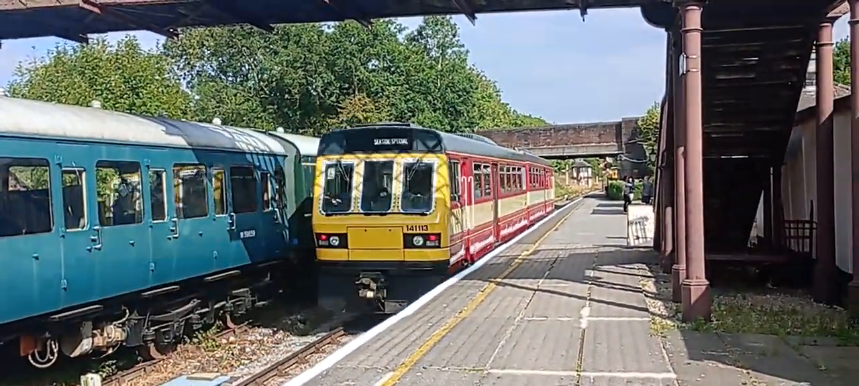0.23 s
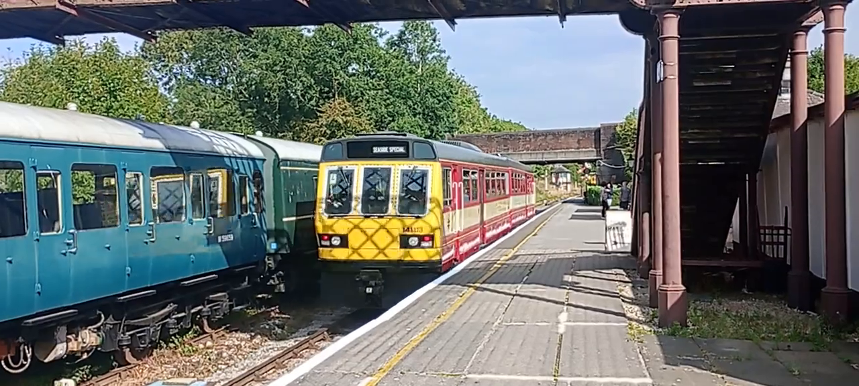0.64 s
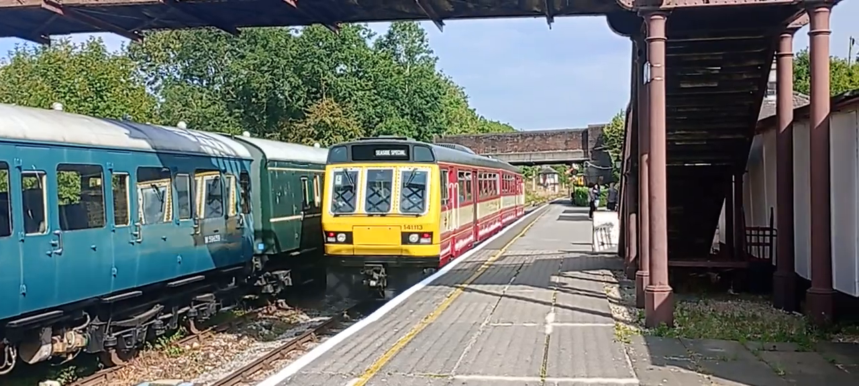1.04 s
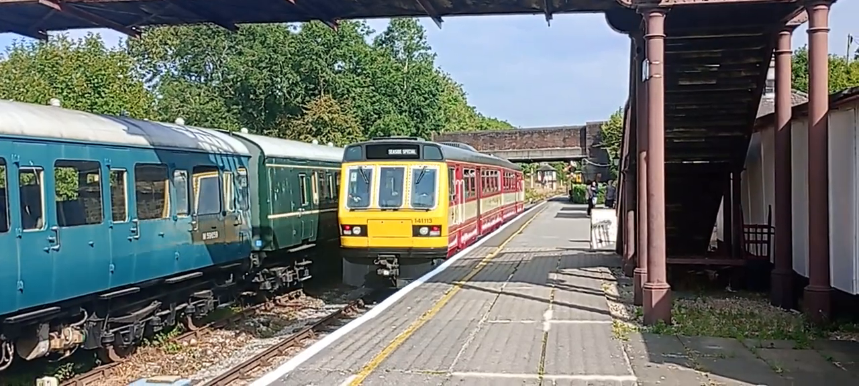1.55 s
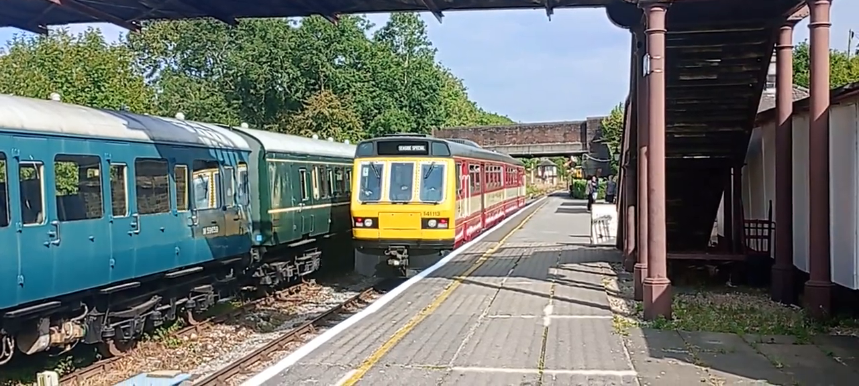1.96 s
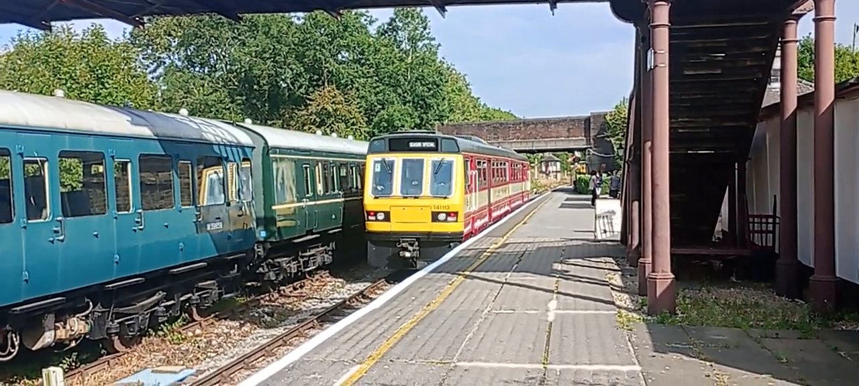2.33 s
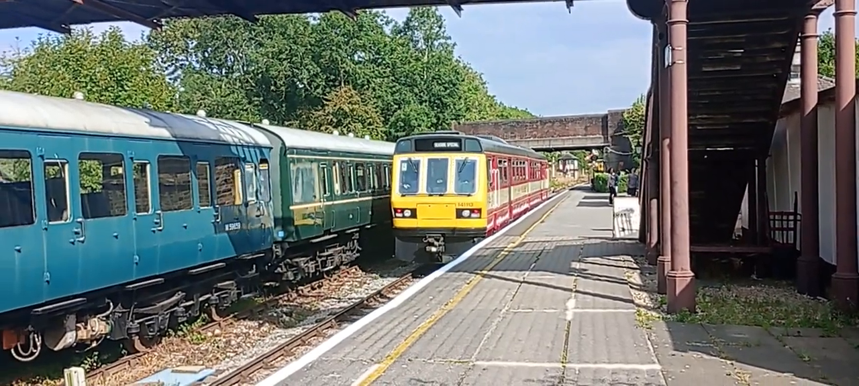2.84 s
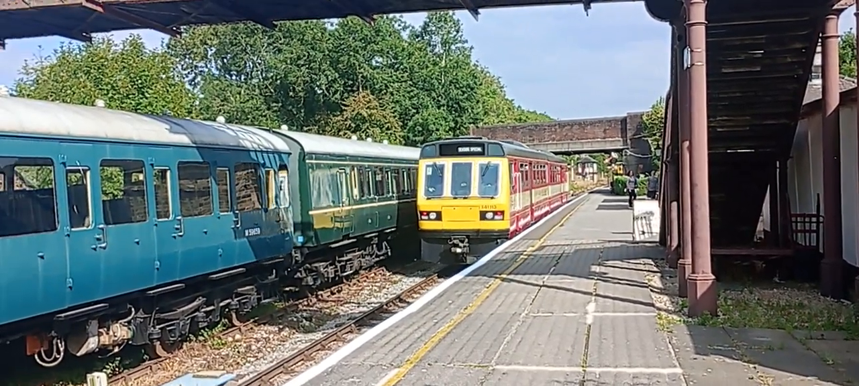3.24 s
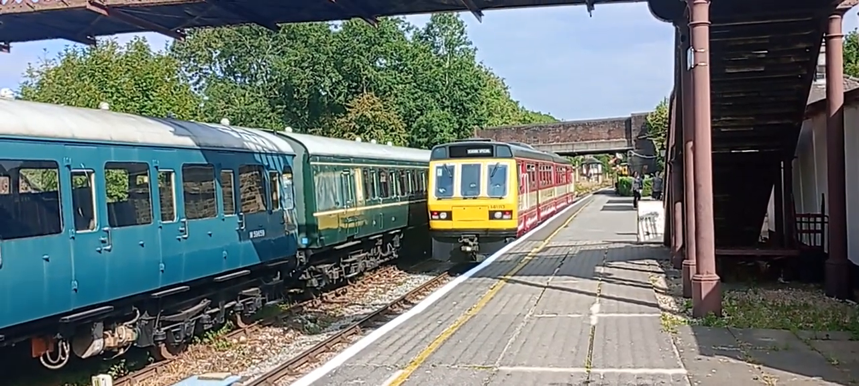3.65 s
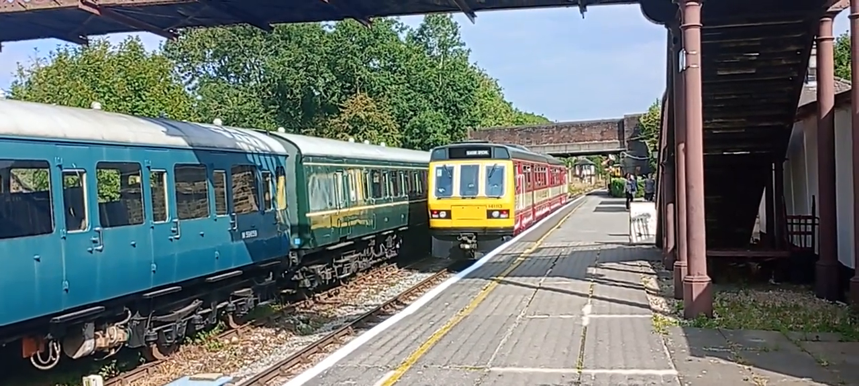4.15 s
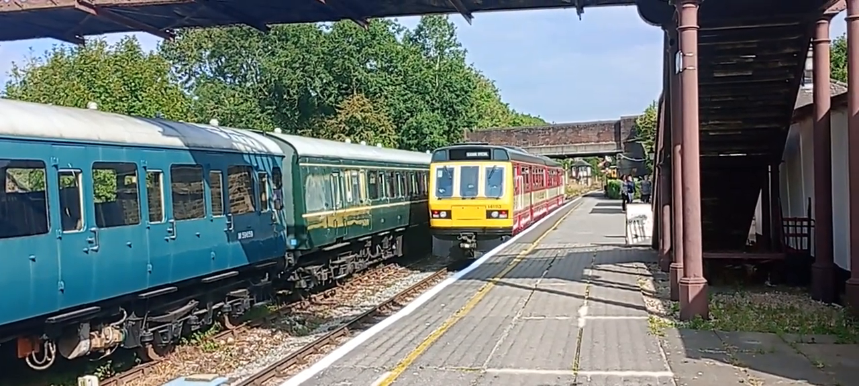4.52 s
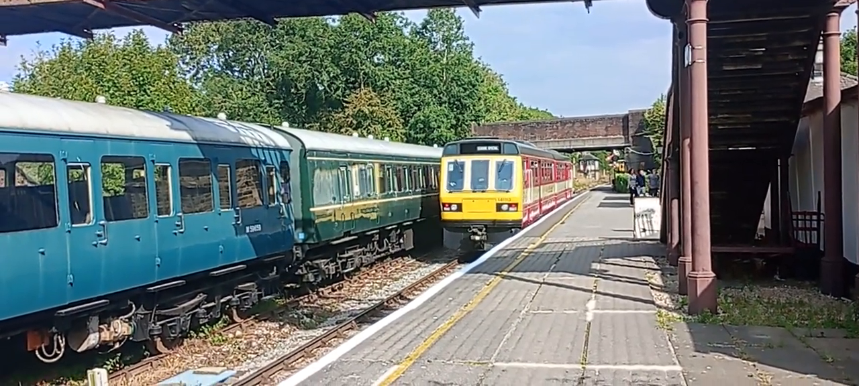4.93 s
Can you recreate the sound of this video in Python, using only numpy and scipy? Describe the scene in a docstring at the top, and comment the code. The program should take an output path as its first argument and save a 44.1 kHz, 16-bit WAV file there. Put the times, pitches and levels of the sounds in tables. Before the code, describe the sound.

A quiet outdoor platform bed: soft airy hiss and a far diesel murmur with a faint low hum near 85 hertz. By about 0.5 s a piercing wheel-flange squeal around 5.7 kHz emerges, jumping up at 0.7 s, beating and fluttering with short station echoes. Harsh, buzzy metallic rasps shake it from 0.7 to 1.5 s, with a brief hollow rumble near 0.9 s. It fades by 1.65 s, leaving mostly engine and air. From 2.45 s the squeal returns in uneven surges, gritty at 2.6 and 2.8-3.1 s, then thinner. A strong low thump with a snap hits the microphone at 3.3 s amid wind flutter. After a scrape at 3.9 s, the squeal swells again, loud and rough from 4.05 to 4.7 s, with bassy puffs near 4.1 s. It dips at 4.8 s, its pitch sagging slightly, and lingers weaker with a last short rasp around 5 s.

```python
"""A wheel flange rubs the rail and squeals as a diesel railbus draws away, heard outdoors from the platform.
The squeal is one wheel mode, sung by a beating pair of tones. Pulses once a swing make the harsher flange
sounds: their strength repeats about every second, third or fourth swing, or tumbles without order, and they
ring filters tuned to the other wheel modes. A few of those modes also sing briefly as sine tones.
Low swings and filtered noise puff on the microphone; coloured noise and a low tone make air and far engine."""
import sys
import numpy as np
from scipy import signal
from scipy.fft import rfft, irfft, next_fast_len
from scipy.io import wavfile
from scipy.ndimage import uniform_filter1d

SR = 44100
rng = np.random.default_rng(int(sys.argv[2]) if len(sys.argv) > 2 else 0)


def store_wav(level_fs):
    """Save 16-bit WAV to argv[1]."""
    pcm = np.round(np.clip(np.atleast_2d(level_fs), -1, 1) * 32767)
    wavfile.write(sys.argv[1], SR, pcm.T.astype(np.int16))


N = 228782
TIME = np.arange(N) / SR  # s

# main wheel mode before sag and jitter: (t/s, f/Hz)
SQUEAL_PITCH = [(0, 5679), (4.0, 5676), (4.4, 5682), (4.74, 5690), (4.82, 5641), (5.07, 5631), (5.12, 5686)]
# the band the main mode can swing in: (low f/Hz, high f/Hz)
SQUEAL_BAND = (5565, 5745)
# the main mode sings three times, one list each, before catches and squeal gain: (t/s, level/dB)
SQUEAL_LEVELS = [
    [(0.3, -82), (0.518, -31.5), (0.6, -35.5), (0.694, -16.5), (1.018, -25.5), (1.16, -20), (1.314, -27.5),
     (1.434, -21), (1.65, -65)],
    [(2.1, -65), (2.442, -50), (2.464, -34.5), (2.652, -20), (2.766, -30.5), (2.938, -20.5), (3.584, -39),
     (3.682, -25), (3.97, -32)],
    [(4.01, -39.5), (4.038, -24), (4.314, -16.5), (4.372, -30.5), (4.416, -14), (4.66, -18), (4.752, -23.5),
     (4.814, -43), (5.188, -31.5)],
]
# brief surges and dips of the squeal: (crest t/s, lift/dB)
CATCHES = [(0.69, -1), (1.39, 2), (2.485, -2), (2.63, 5), (2.955, 0.5), (3.075, 9), (4.129, 6), (4.59, 4)]
CATCH_S = 0.018  # from the crest to 1/e of the lift
# harshness of the rubbing, which shakes the squeal: (t/s, amount 0-1)
HARSHNESS = [(.4, 0.98), (1.2, 1.0), (1.5, 0.73), (2.6, 0.6), (4.3, .55), (4.45, 0.2), (5.19, 0.7)]

# rubs with a bounce on every second swing, before the layer gains:
# (start t/s, end t/s, start level/dB, end level/dB)
RUBS = [(0.693, 0.905, -27.5, -29), (1.035, 1.338, -27, -24.5), (1.421, 1.47, -27, -34.5),
        (2.556, 2.625, -28, -30.5), (2.805, 3.083, -30.5, -43), (3.29, 3.476, -42.5, -51.5),
        (3.673, 3.754, -41, -44.5), (3.833, 3.925, -30.5, -33.5), (4.101, 4.7, -29, -23.5),
        (5.004, 5.108, -28.5, -32.5)]
RUB_RISE_S, RUB_FALL_S = 0.015, 0.047
# scale of the bounce's frequency wander: (t/s, f/Hz)
BOUNCE_SLIP = [(.9, 220.5), (1.5, 99), (2.6, 140.6), (3.9, 73.8), (4.3, 188.2), (4.7, 150.5), (4.8, 39.6)]
# bouts of slower chatter, before the layer gain:
# (start t/s, end t/s, bounces per swing, level/dB, scale of frequency wander f/Hz)
CHATTER_BOUTS = [(0.66, 0.76, 0.21, -41, 68.6), (0.77, 0.883, 0.25, -29, 114.5),
                 (1.307, 1.327, 0.26, -47, 97.5), (2.537, 2.642, 0.25, -45, 88.2),
                 (2.805, 2.838, 0.27, -35, 124.5), (2.944, 2.975, 0.26, -28, 129.8),
                 (2.998, 3.088, 0.31, -32.5, 125), (3.299, 3.413, 0.37, -40.5, 54.6),
                 (3.3, 3.42, 0.24, -45.5, 53), (3.71, 3.753, 0.25, -49, 60), (3.827, 3.921, .25, -30, 48.8),
                 (4.054, 4.203, 0.26, -46, 86.7), (4.064, 4.209, 0.38, -46.5, 87),
                 (4.53, 4.707, 0.265, -34.5, 82.4), (4.987, 5.117, 0.26, -48, 60.4)]
# the flange bites and grinds without order, before the layer gain: (start t/s, end t/s, level/dB)
BITES = [(0.44, 0.62, -74.5), (0.765, 0.915, -36.5), (2.802, 2.845, -57.5), (2.926, 3, -52),
         (4.338, 4.357, -41.5), (4.506, 4.53, -42.5), (4.666, 4.683, -37)]
BITE_RISE_S, BITE_FALL_S = 0.035, 0.034
RUB_GRIT_DB = -32  # grit relative to the rub gain, before the grinding gain

# resonances of the wheel: (f/Hz, width f/Hz, mean level/dB)
WHEEL_MODES = [(1606, 104, -3), (2023, 220, 1), (2832, 257, 0), (3337, 147, 9), (3483, 42, -1.5),
               (4023, 152, 0.5), (4330, 46, 4), (5094, 60, 9.5), (6104, 90, 8.5), (6997, 170, 3.5),
               (7280, 60, -23), (8070, 315, 6.5), (8440, 65, -26), (9190, 90, 7), (9620, 690, 10),
               (11600, 28, 10), (12000, 60, 6), (13700, 300, 2)]
# how well the wheel radiates contact forces: (f/Hz, level/dB)
WHEEL_RADIATION = [(500, -45.5), (1100, -18.5), (1500, -9), (2100, -3), (2800, 2.5), (4200, -1.5),
                   (5600, 9.5), (7000, -5), (8900, -5.5), (9500, -29), (11300, -8.5), (12500, -19.5),
                   (15800, -26)]
# change of treble over the distance: (t/s, level/dB)
DULLING = [(.9, -2.5), (1.5, -9), (5.19, -4.5)]
# other wheel modes that sing briefly, before echoes and mix: (start t/s, end t/s, f/Hz, level/dB)
SIDE_TONES = [(0.677, 0.798, 4296, -46), (0.747, 0.89, 3397, -33), (3.382, 3.81, 5413, -51),
              (4.05, 4.095, 6225, -41), (4.07, 4.1, 3380, -41), (4.557, 4.78, 3260, -59),
              (4.676, 4.733, 1561, -44.5), (4.688, 4.93, 6840, -58.5), (4.773, 5.188, 3333, -57),
              (4.76, 5.194, 13600, -75), (4.76, 5.19, 14900, -75)]

# the stronger puffs of air on the microphone: (t/s, nominal level/dB, f/Hz)
PUFFS = [(0.372, -44, 113), (0.995, -33, 91.5), (1.223, -38.5, 85.6), (1.46, -45, 104), (1.522, -39, 88),
         (3.079, -41.5, 73), (3.323, -13, 134), (3.595, -34.5, 82), (3.647, -34, 89.4), (3.716, -37, 87),
         (4.016, -32.5, 76.5), (4.064, -26, 114), (4.101, -18, 101), (4.266, -35.5, 139), (4.465, -34, 113),
         (4.588, -31, 102), (4.634, -35.5, 89.4), (4.733, -34, 95.5), (5.144, -26, 87)]
# gusts that flutter on the microphone, before their lumps: (start t/s, end t/s, level/dB)
GUSTS = [(3.23, 3.424, -52), (4.268, 4.333, -39.5), (4.506, 4.81, -44.5)]
# band of the gust flutter: (low f/Hz, high f/Hz)
GUST_BAND = (39, 123)

# spectral shape of the engine murmur and open air: (f/Hz, relative level per Hz/dB)
AIR_COLOUR = [(25, -43), (55, -1), (82, -0.5), (125, -4.5), (220, -9.5), (370, -16.5), (520, -9.5),
              (760, -12.5), (1100, -12.5), (2100, -18.5), (4500, -22), (5750, -18), (6700, -27.5),
              (8900, -35), (9800, -40), (15800, -42)]
# level of that bed, before its slow drift: (t/s, level/dB)
AIR_LEVEL = [(0, -53.5), (1.7, -53.5), (2.4, -55), (5.19, -57.5)]
ENGINE_HZ, ENGINE_DB = 85, -62  # middle pitch and middle level
# one hollow rumble: (t/s, level/dB)
RUMBLE_LEVEL = [(.85, -55.5), (.9, -33), (.93, -36.5), (1.0, -58)]
# its spectral shape: (f/Hz, relative level per Hz/dB)
RUMBLE_COLOUR = [(50, -9), (130, -10), (280, -4), (480, -7.5), (750, -14), (1300, -20.5), (3000, -37)]
CUTOFF_HZ = 15800  # top of the recorded band


def squeal(swing, squeal_db=1.52, beat_hz=30, beat_drift_hz=13, partner_db=-3, overtone_db=-37, skirt_db=-18,
           span_s=0.11):
    """Both wheels of the axle sing, a little apart, and beat; the rough rail spreads a skirt around the tones."""
    beat = phase_of(beat_hz + beat_drift_hz * drift(rate_hz=25.18))
    partner = from_db(partner_db) * np.sin(swing - beat)
    pair = station(np.sin(swing) + partner, wet_db=1.5, t60=1.0)
    mode_filter = signal.butter(3, SQUEAL_BAND, "band", fs=SR, output="sos")
    tone = evened(signal.sosfilt(mode_filter, pair), span_s)

    octave = from_db(overtone_db) * np.sin(2 * swing)
    shaken = from_db(skirt_db) * in_time(HARSHNESS) ** 3 * drift(rate_hz=324)
    skirt = shaken * (np.sin(swing) + from_db(-18.5) * np.sin(2 * swing))
    edges = station(octave + skirt, wet_db=4.5, t60=0.32)
    return from_db(squeal_db) * singing() * (tone + edges)


def singing():
    """Gain of the squeal: flange pressure makes it swell and fade, with brief surges and dips on top."""
    lift_db = sum(db * np.exp(-((TIME - crest) / CATCH_S) ** 2) for crest, db in CATCHES)
    return from_db(in_time(np.vstack(SQUEAL_LEVELS)) + lift_db)


def bouncing(swing, bounce_db=-8):
    """Strong and weak touches alternate, which sounds an octave under the squeal."""
    alternation = pattern(swing, 1 / 2, in_time(BOUNCE_SLIP))
    return touching(from_db(bounce_db) * rubbing() * alternation, swing, tilt_db=-0.8)


def rubbing():
    """Gain of the rubs: each catches fast, swells or eases evenly in dB, and dies away."""
    gain = np.zeros(N)
    for start, end, first_db, last_db in RUBS:
        slope = from_db(np.interp(TIME, [start, end], [first_db, last_db]))
        gain += slope * bout(start, end, RUB_RISE_S, RUB_FALL_S)
    return gain


def chattering(swing, chatter_db=-3):
    """Slower bounce patterns put pairs of lines between the squeal's harmonics."""
    strength = np.zeros(N)
    for start, end, per_swing, db, unsteady_hz in CHATTER_BOUTS:
        gain = from_db(db) * bout(start, end, rise=0.0065, fall=0.037)
        strength += gain * pattern(swing, per_swing, unsteady_hz)
    return touching(from_db(chatter_db) * strength, swing, tilt_db=1.07)


def grinding(swing, grind_db=2, tangle_db=2, tangle_hz=450, clump_db=0.8):
    """The bounce rate tumbles about, while noise gives the touches uneven strengths in short clumps."""
    low_pass = signal.butter(8, 2800, fs=SR, output="sos")
    touches = rms_one(signal.sosfilt(low_pass, rng.standard_normal(N)))
    tangle = from_db(tangle_db) * pattern(swing, 0.42, tangle_hz)
    pressure = from_db(grind_db + clump_db * drift(rate_hz=91)) * biting()
    return touching(pressure * (touches + tangle), swing, tilt_db=1.7)


def biting():
    """Gain of the grinding: hard bites, and a little grit in every rub."""
    bites = sum(from_db(db) * bout(start, end, BITE_RISE_S, BITE_FALL_S) for start, end, db in BITES)
    return bites + from_db(RUB_GRIT_DB) * rubbing()


def pattern(swing, per_swing, unsteady_hz, wander=0.7):
    """Touch strength repeats at a fraction of the swing rate, with quick slips and slower glides."""
    slips_and_glides = drift(rate_hz=240) + wander * drift(rate_hz=25)
    return np.cos(per_swing * swing + phase_of(unsteady_hz * slips_and_glides))


def touching(strength, swing, tilt_db):
    """The flange touches once a swing: three harmonics, weaker upward for negative tilt, stronger for positive."""
    harmonics = sum(2 * from_db(tilt_db * k * k) * np.cos(k * swing) for k in range(1, 4))
    return strength * (1 + harmonics)


def through_wheel(force, broad_db=-7, shifting_db=4):
    """Uneven touches ring the other modes; as the contact point moves, each mode comes and goes."""
    rings = np.zeros(N)
    for hz, width_hz, db in WHEEL_MODES:
        mode_gain = from_db(db + shifting_db * drift(rate_hz=27.6))
        rings += mode_gain * resonance(force, hz, width_hz)
    return colour(from_db(broad_db) * force + rings, WHEEL_RADIATION)


def far_off(x, edge_hz=8500):
    """Distance through air takes treble: the loss deepens, then partly eases."""
    treble = colour(x, [(edge_hz / 2, -30), (edge_hz, -3), (edge_hz * 2.3, 0)])
    return x + (from_db(in_time(DULLING)) - 1) * treble


def side_tones(waver_hz=26):
    """Other modes catch for a moment as wavering sine tones and ring out."""
    out = np.zeros(N)
    for start, end, hz, db in SIDE_TONES:
        tone = np.sin(phase_of(hz + waver_hz * drift(rate_hz=131)))
        out += from_db(db) * bout(start, end, rise=0.0075, fall=0.0082) * tone
    return out


def station(x, wet_db, t60, count=160):
    """Many short echoes off coaches, platform and footbridge; they interfere and make a tone flutter."""
    delays_s = rng.uniform(0.002, 0.25, count)
    echoes = np.zeros(SR // 4 + 1)
    echoes[(delays_s * SR).astype(int)] = rng.standard_normal(count) * from_db(-60 * delays_s / t60)
    return x + from_db(wet_db) * signal.fftconvolve(x, echoes / np.linalg.norm(echoes))[:N]


def thumps(swirl_db=-10, swirl_s=0.03, push_cycles=0.89, snap_hz=350, snap_db=-1, hard_db=-24):
    """Each puff is a short low swing and a swirl of turbulence; those above hard_db also snap."""
    out = np.zeros(N)
    for start, db, hz in PUFFS:
        cycles = np.maximum(TIME - start, 0) * hz
        swell = cycles / push_cycles * np.exp(1 - cycles / push_cycles)
        push = np.sin(2 * np.pi * cycles) * swell

        band = signal.butter(3, [0.54 * hz, hz + 85], "band", fs=SR, output="sos")
        eddies = rms_one(signal.sosfilt(band, rng.standard_normal(N)))
        swirl = from_db(swirl_db) * eddies * bout(start + 0.0054, start + 0.011, rise=0.0065, fall=swirl_s)

        spike = (2 * snap_hz * (TIME - start - 0.005)) ** 2
        snap = (2 * spike - 1) * np.exp(-spike)
        soft = from_db(min(db, hard_db))
        excess = from_db(db) - soft  # zero for the softer puffs
        out += soft * (1.1 * push + swirl) + from_db(snap_db) * excess * snap
    return out


def buffeting(lumpy_db=3):
    """Gusts flutter on the microphone in low, uneven lumps."""
    band = signal.butter(3, GUST_BAND, "band", fs=SR, output="sos")
    eddies = rms_one(signal.sosfilt(band, rng.standard_normal(N)))
    strength = sum(from_db(db) * bout(start, end, rise=0.038, fall=0.025) for start, end, db in GUSTS)
    return strength * from_db(lumpy_db * drift(rate_hz=16)) * eddies


def background():
    """Far engine with its firing note, open air, and one hollow rumble."""
    air_gain = from_db(in_time(AIR_LEVEL) + 1.4 * drift(rate_hz=13.8))
    air = air_gain * rms_one(colour(rng.standard_normal(N), AIR_COLOUR))
    firing_gain = from_db(ENGINE_DB + 2 * drift(rate_hz=13.0))
    firing = firing_gain * np.sin(phase_of(ENGINE_HZ + 4 * drift(rate_hz=12.4)))
    rumble = level(RUMBLE_LEVEL) * rms_one(colour(rng.standard_normal(N), RUMBLE_COLOUR))
    return air + firing + rumble


def from_db(db):
    """Decibels to gain."""
    return 10 ** (np.asarray(db) / 20)


def rms_one(x):
    """Scale to unit power."""
    return x / np.sqrt(np.mean(x ** 2) + 1e-20)


def in_time(rows):
    """Join (t/s, value) rows by straight lines."""
    return np.interp(TIME, *np.transpose(rows))


def level(rows):
    """Gain from (t/s, level/dB) rows, practically silent outside them."""
    return from_db(np.interp(TIME, *np.transpose(rows), left=-200, right=-200))


def bout(start, end, rise, fall):
    """Gain that swells up to the start, holds and dies away after the end; all in seconds."""
    return np.exp(np.minimum(TIME - start, 0) / rise - np.maximum(TIME - end, 0) / fall)


def colour(x, spectrum):
    """Filter by (f/Hz, level/dB) points joined on a log frequency axis."""
    hz, db = np.transpose(spectrum)
    size = next_fast_len(N)
    bins_hz = np.maximum(np.fft.rfftfreq(size, 1 / SR), 1)
    gain = from_db(np.interp(np.log(bins_hz), np.log(hz), db))
    return irfft(rfft(x, size) * gain, size)[:N]


def drift(rate_hz):
    """Smooth random wander of unit power: noise through two equal low-pass poles."""
    r = np.exp(-2 * np.pi * rate_hz / SR)
    noise = rng.standard_normal(N + SR)  # the first second settles the filter
    return rms_one(signal.lfilter([1], [1, -2 * r, r * r], noise)[SR:])


def phase_of(hz):
    """Running phase of a moving frequency, in radians."""
    return 2 * np.pi * np.cumsum(hz) / SR


def resonance(x, hz, width_hz):
    """One two-pole resonance with a gain of about 1 on top."""
    r = np.exp(-np.pi * width_hz / SR)
    zeros = np.array([1, 0, -1]) * (1 - r * r) / 2
    poles = [1, -2 * r * np.cos(2 * np.pi * hz / SR), r * r]
    return signal.lfilter(zeros, poles, x)


def evened(x, span_s):
    """Hold the slow level at 1 and keep the faster flutter."""
    return x / np.sqrt(np.maximum(uniform_filter1d(x * x, int(span_s * SR)), 1e-12))


def scene(sag_hz=32, jitter_hz=14):
    """One swing phase drives squeal and flange; its pitch jitters and sags at random, deeper when harsh."""
    sag = sag_hz * in_time(HARSHNESS) * np.abs(drift(rate_hz=55.0))
    swing = phase_of(in_time(SQUEAL_PITCH) - sag + jitter_hz * drift(rate_hz=92.0))
    force = bouncing(swing) + chattering(swing) + grinding(swing)
    flange = from_db(-6.0) * station(far_off(through_wheel(force)), wet_db=0.5, t60=0.045)
    other_modes = station(side_tones(), wet_db=8.5, t60=0.25)
    mix = squeal(swing) + flange + other_modes + thumps() + buffeting() + background()
    return mix[None]  # one channel


def record(dry, low_cut_hz=38):
    """The microphone loses the deep bass; the top is cut steeply."""
    thinned = signal.sosfilt(signal.butter(2, low_cut_hz, "high", fs=SR, output="sos"), dry)
    return signal.sosfilt(signal.ellip(12, 0.1, 80, CUTOFF_HZ, fs=SR, output="sos"), thinned)


dry = scene()
out = record(dry)
store_wav(out)
```